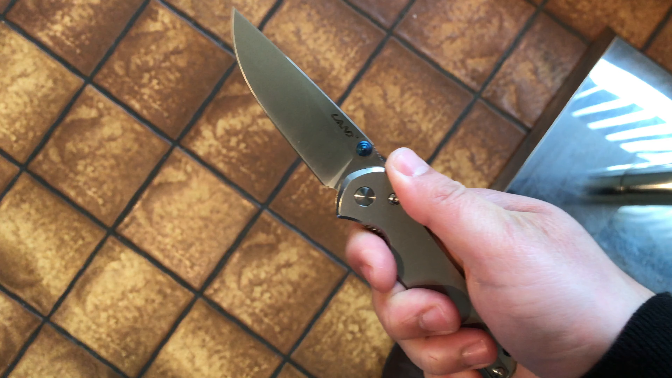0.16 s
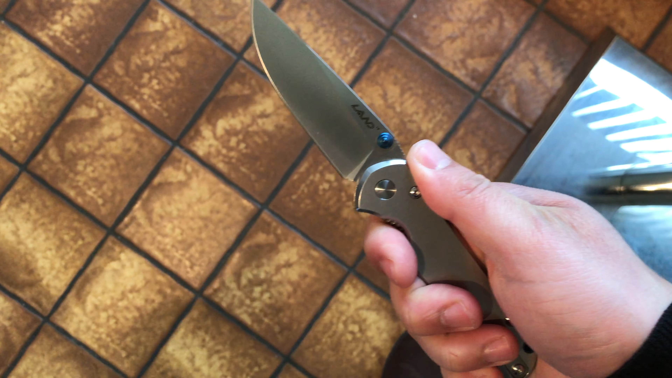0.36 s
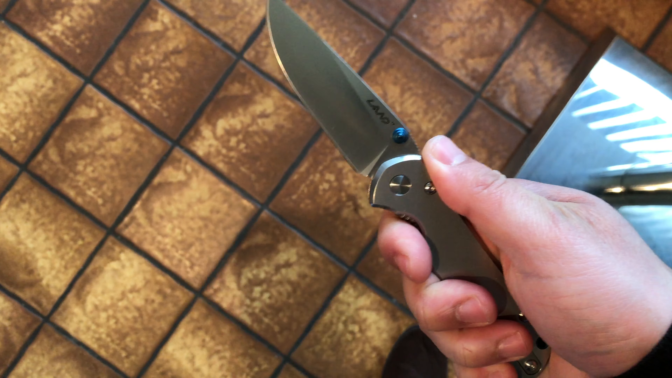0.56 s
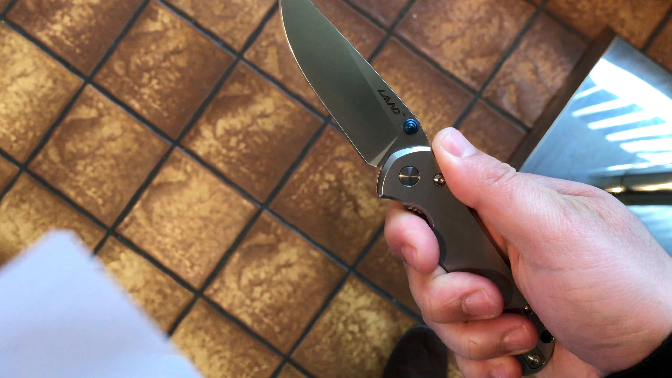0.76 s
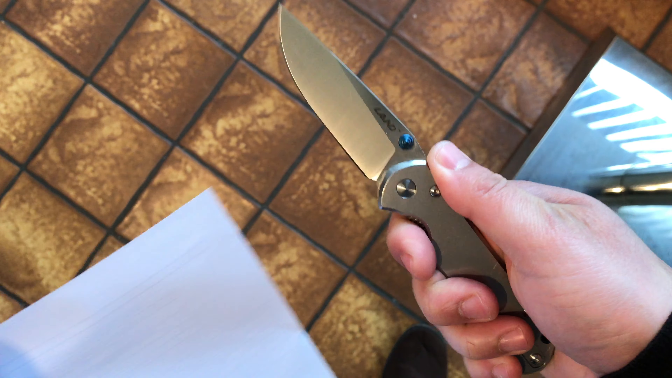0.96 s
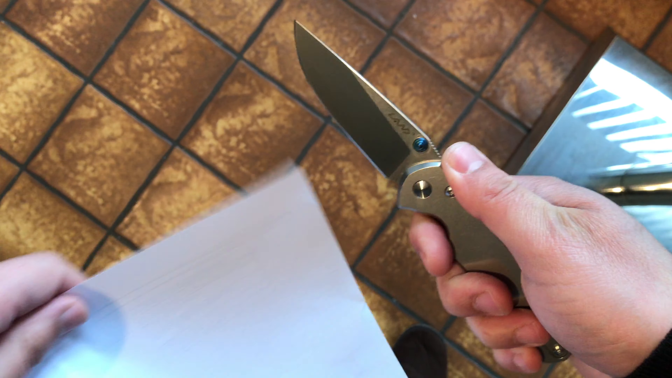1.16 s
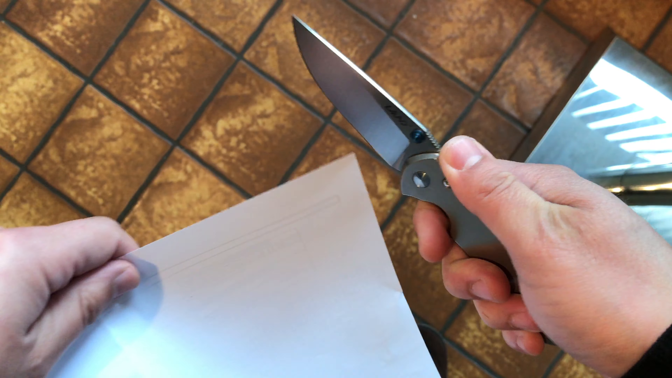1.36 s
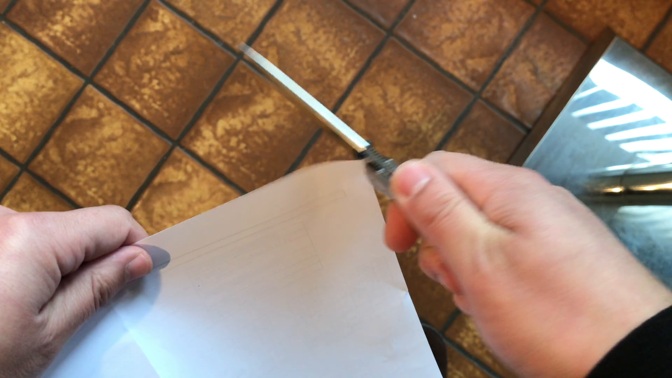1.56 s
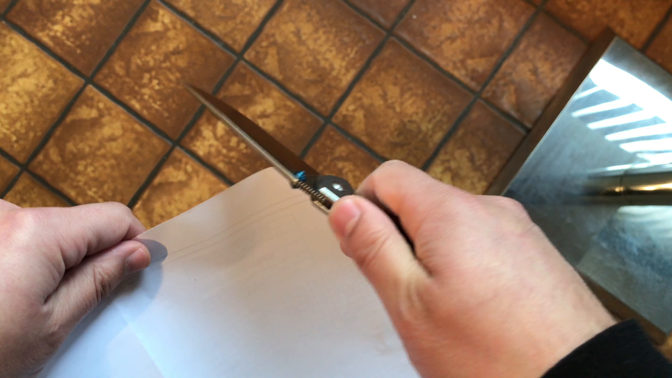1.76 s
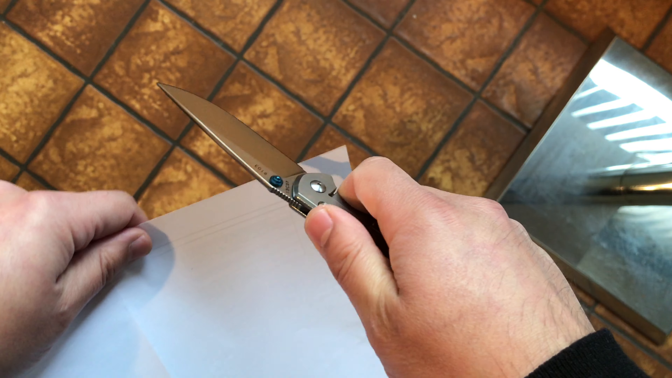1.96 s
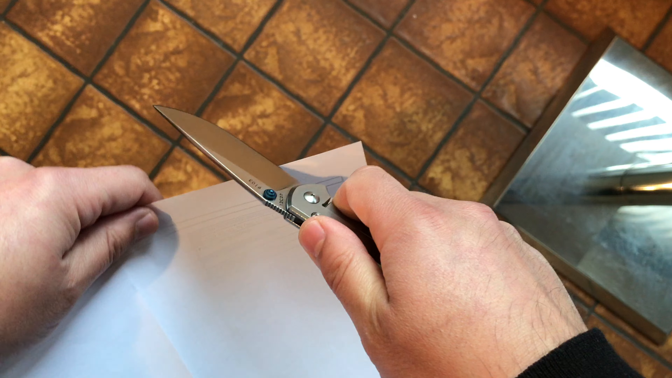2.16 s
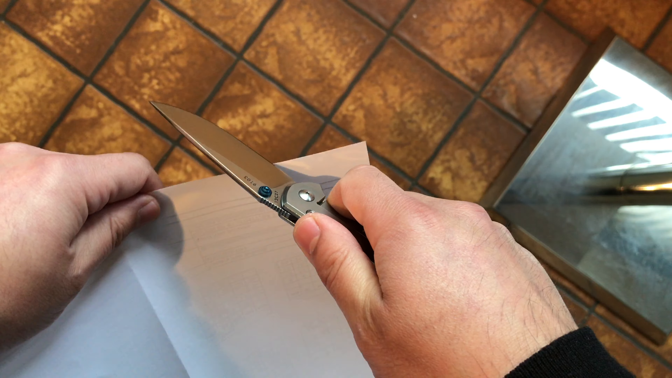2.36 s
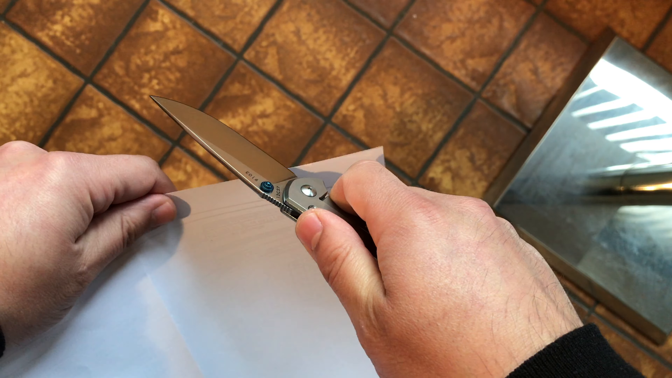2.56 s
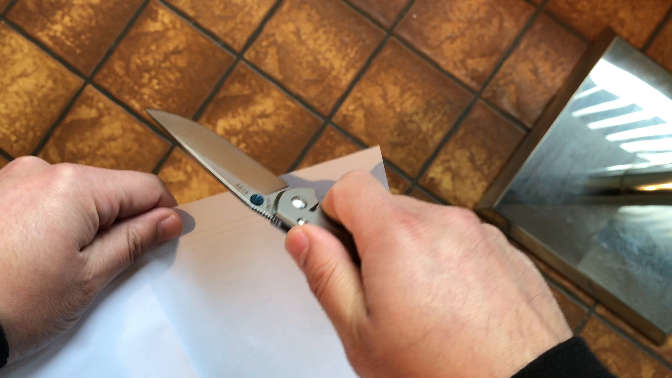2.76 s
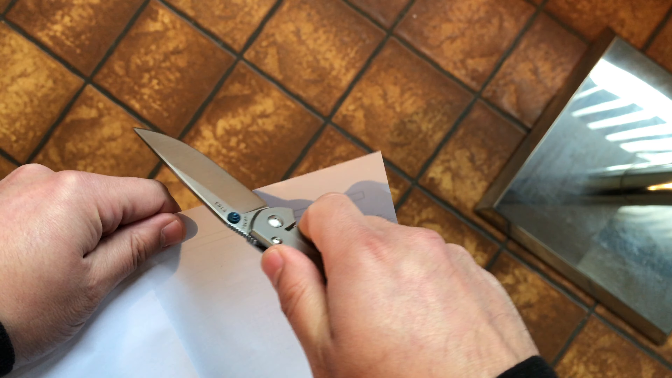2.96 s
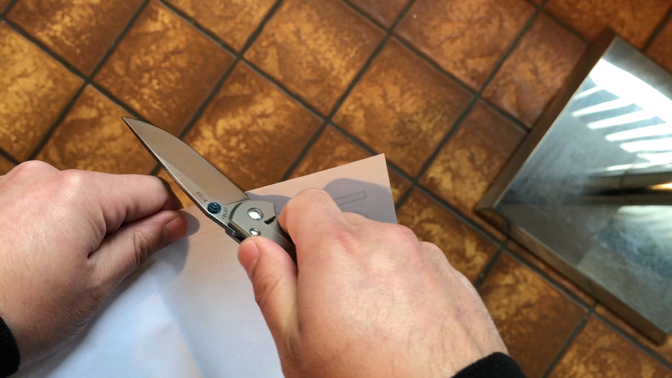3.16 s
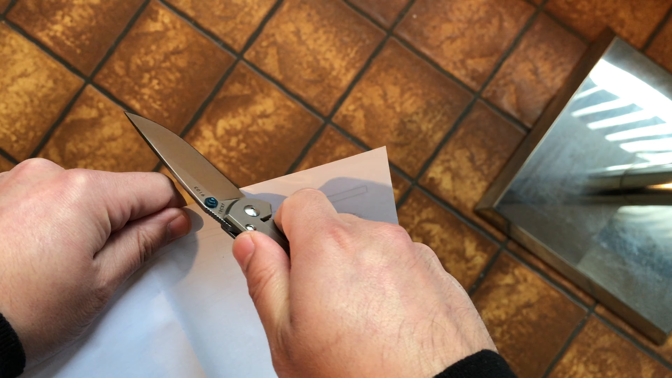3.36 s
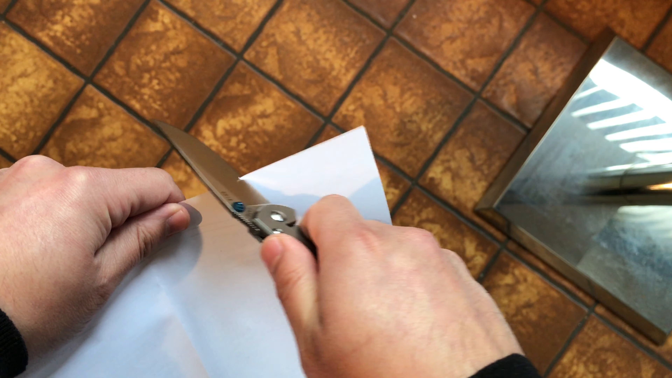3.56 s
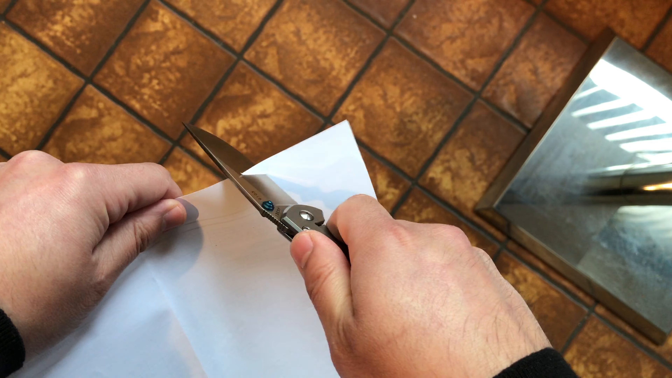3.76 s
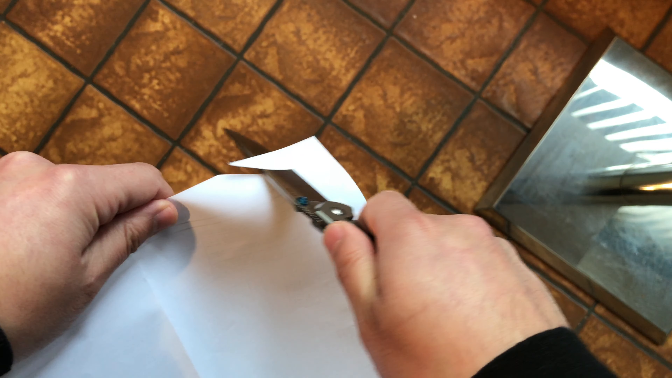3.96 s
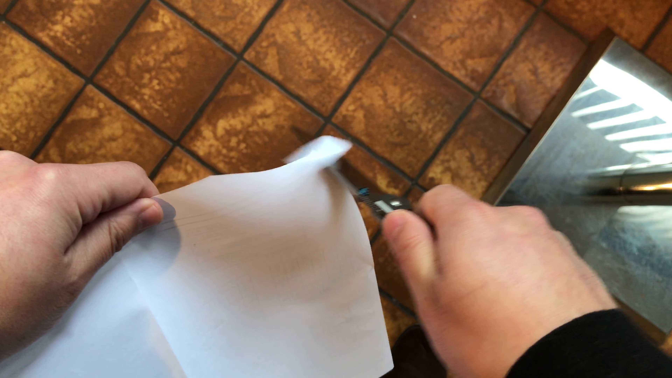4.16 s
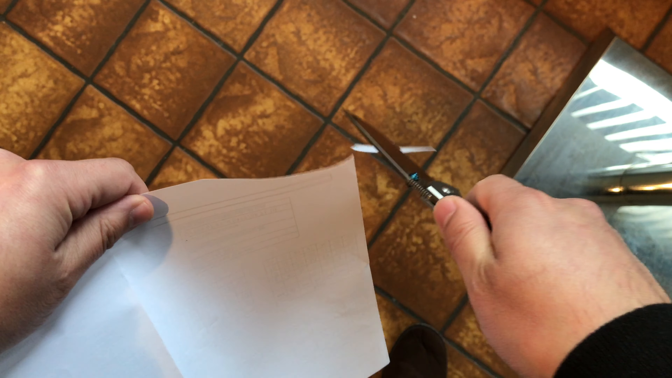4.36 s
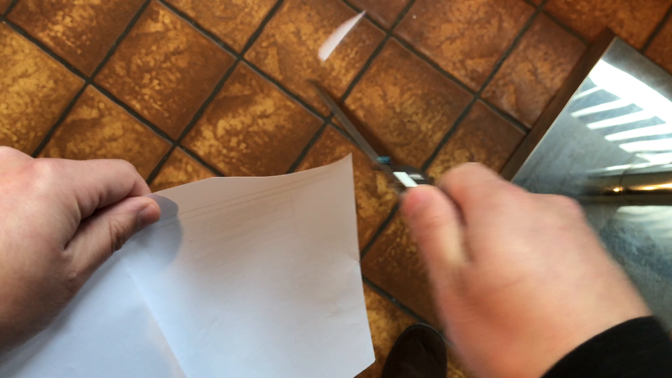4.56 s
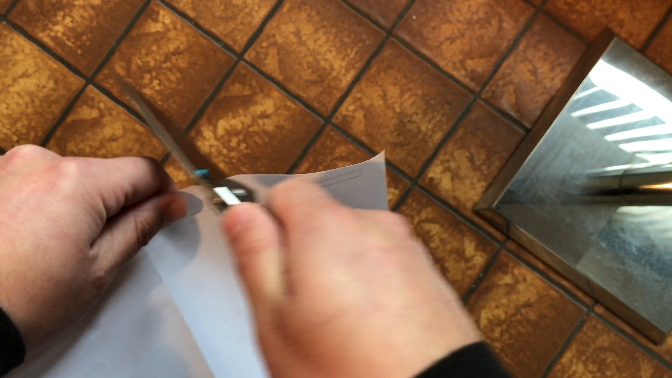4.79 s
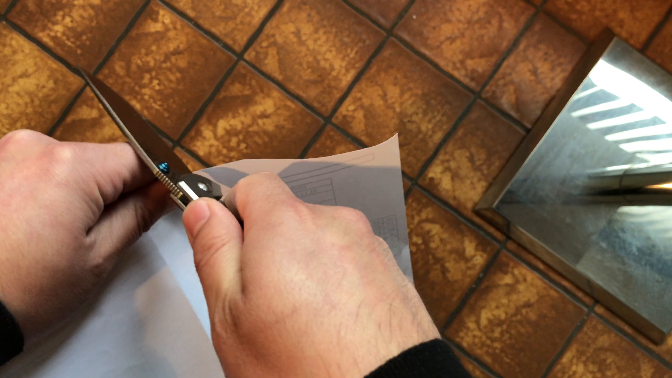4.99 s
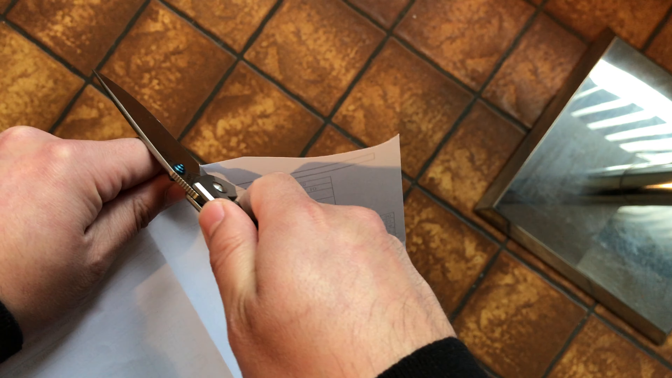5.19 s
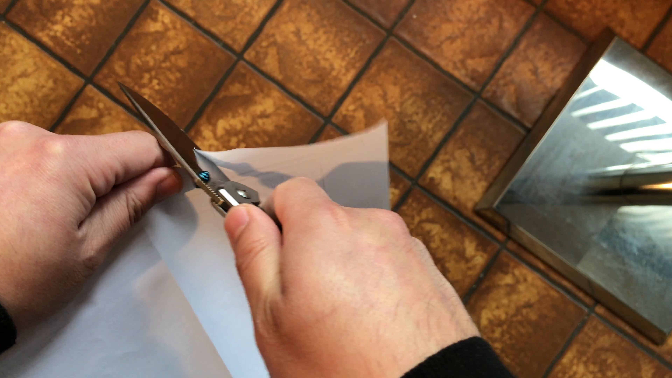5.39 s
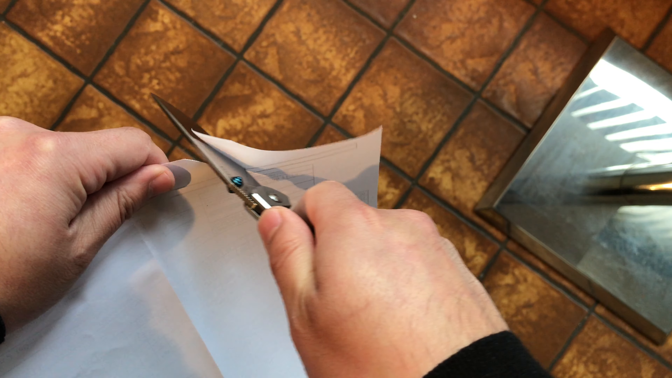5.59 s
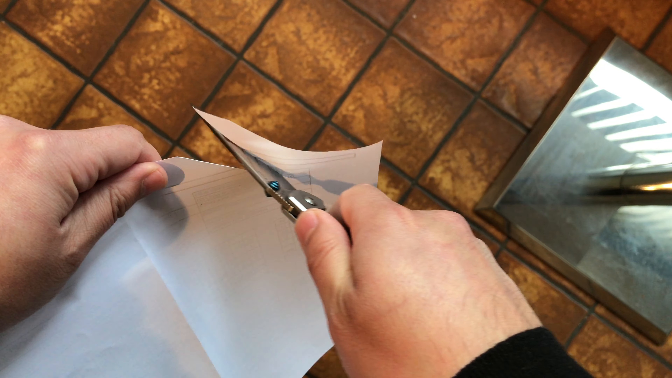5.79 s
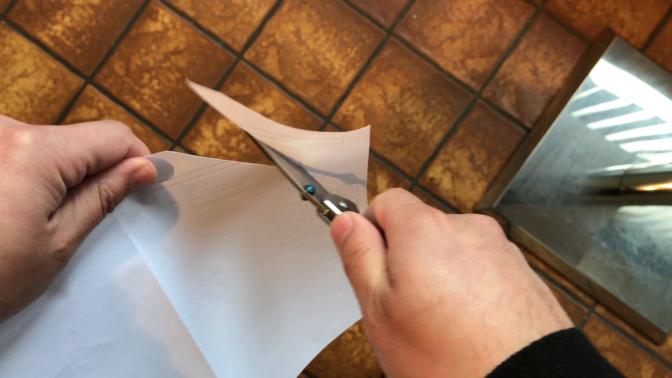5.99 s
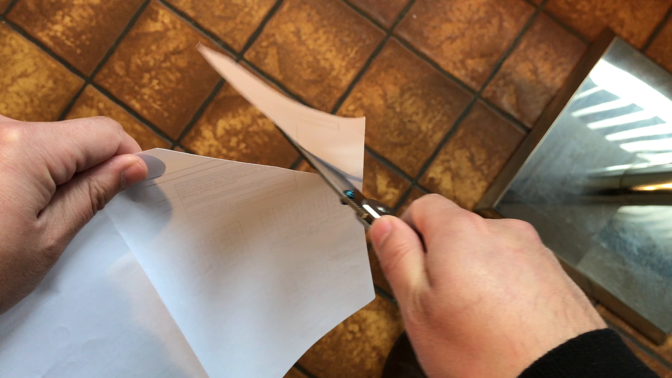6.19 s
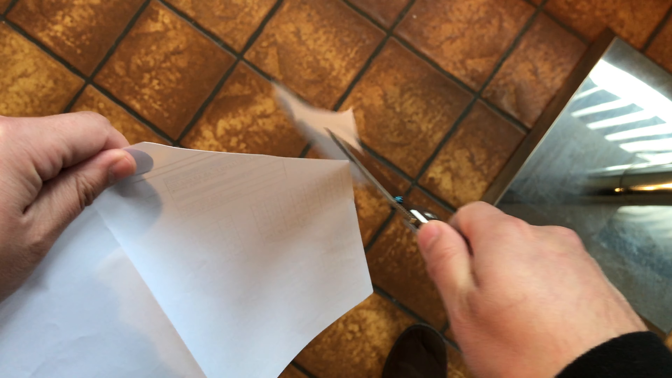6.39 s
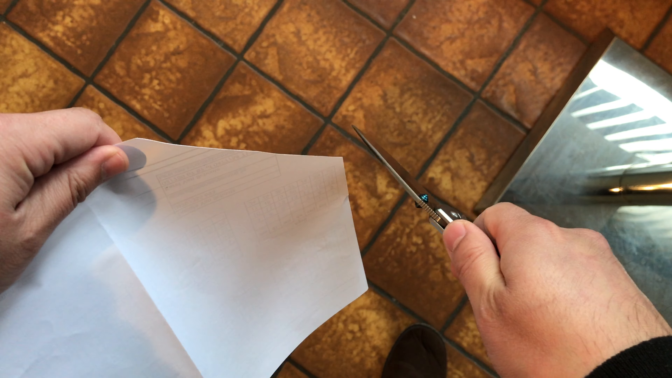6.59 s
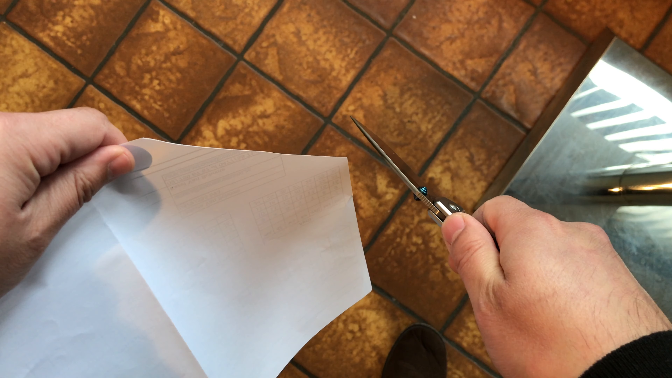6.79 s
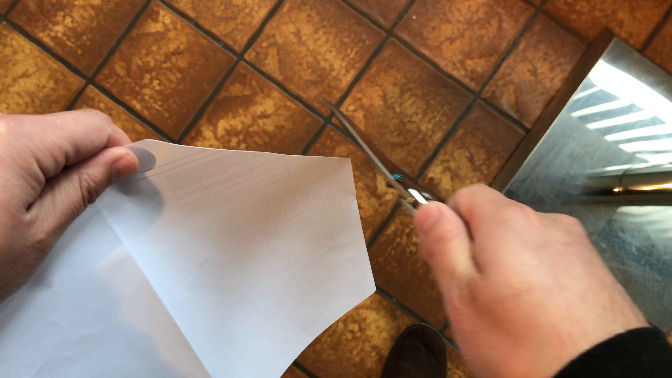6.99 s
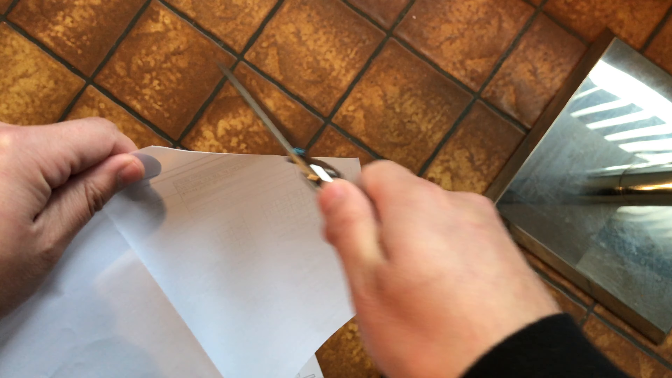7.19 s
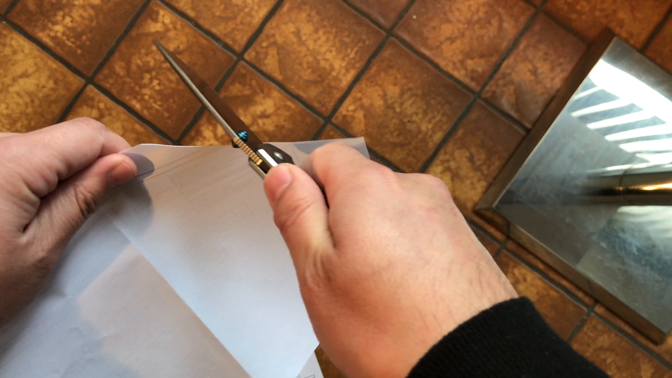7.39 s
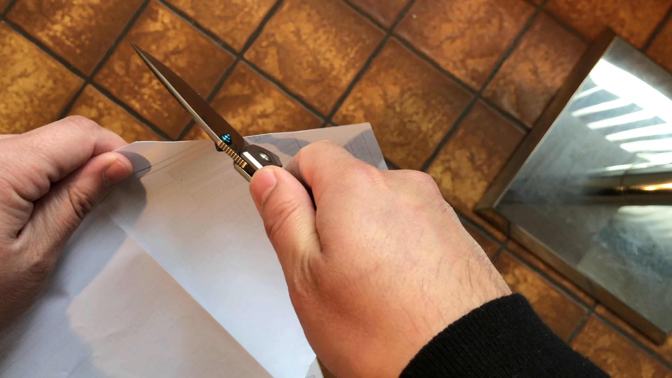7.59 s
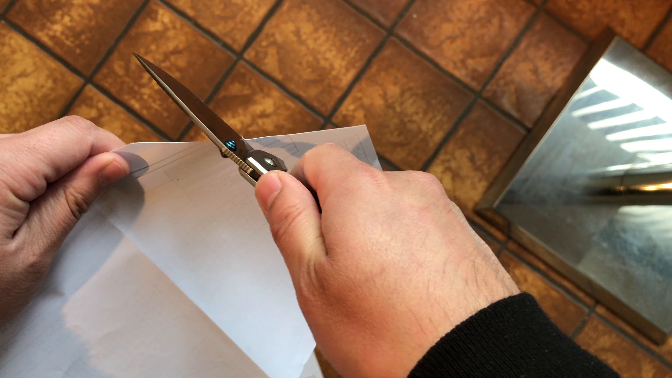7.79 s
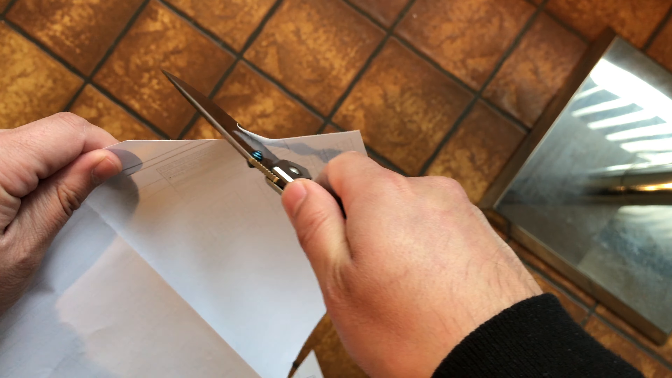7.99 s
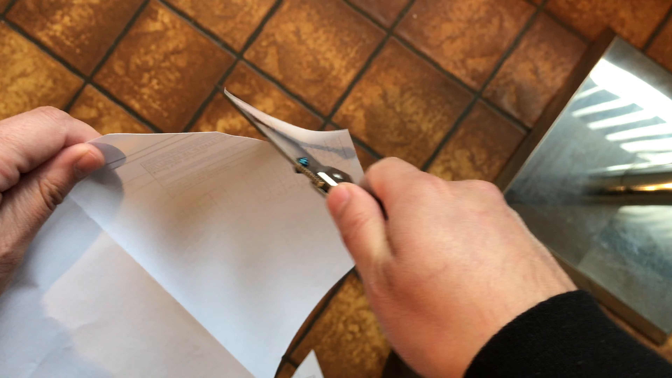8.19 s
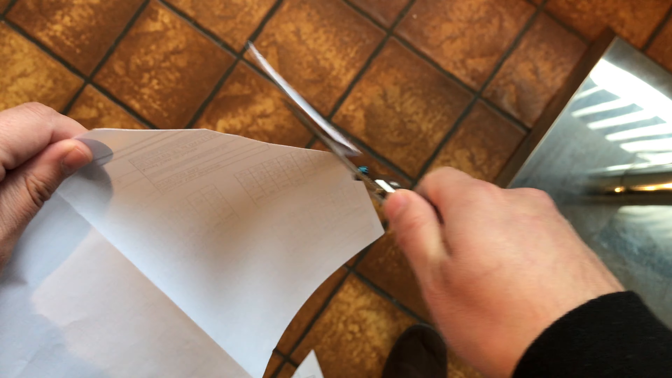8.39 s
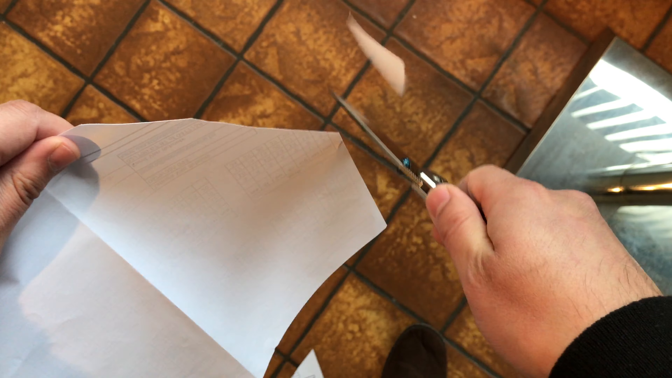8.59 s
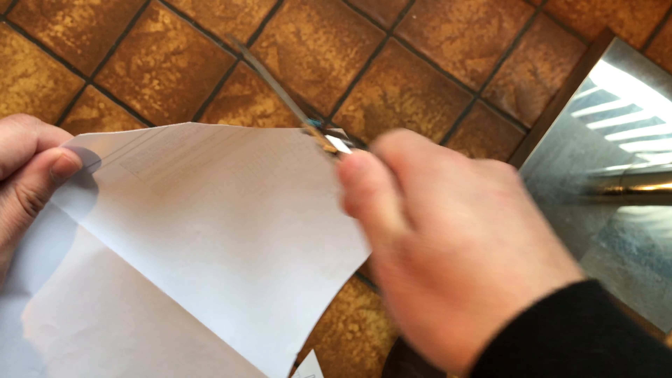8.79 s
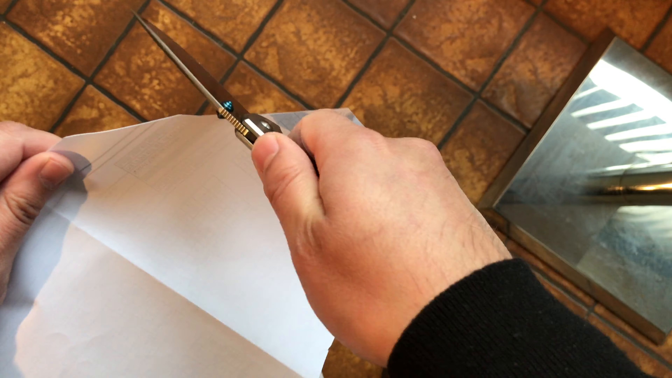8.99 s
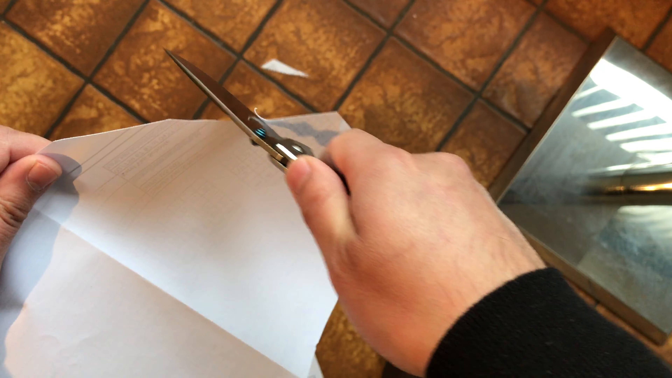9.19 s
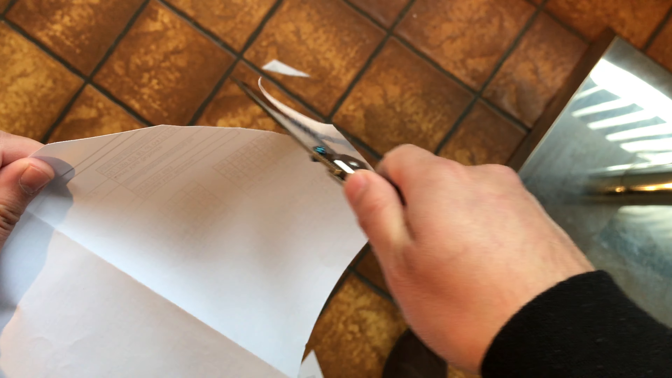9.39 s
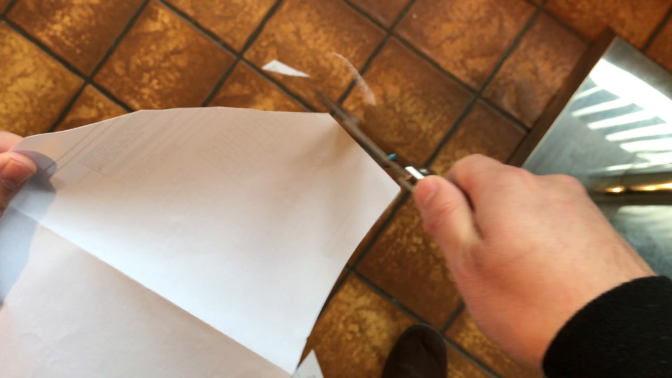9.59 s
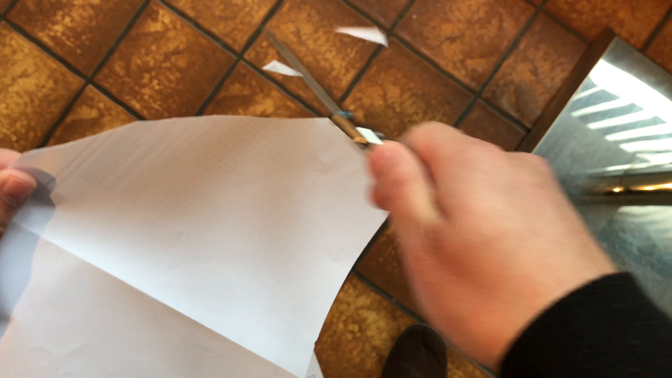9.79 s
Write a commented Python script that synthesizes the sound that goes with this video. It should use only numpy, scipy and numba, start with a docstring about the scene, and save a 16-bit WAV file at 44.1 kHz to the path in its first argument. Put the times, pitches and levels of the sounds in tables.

```python
"""A faint appliance hum and still air run throughout, in a tiled room, close to one microphone.
First a hand-held sheet of paper is picked up: it rustles, pops and flaps as buckles let go and fingers rub it.
Then a sharp folding knife slices strips off in five strokes, the third made of two pushes: the edge snaps
thousands of fibres, the curling strip rings and the blade mirrors the hiss. Late in the second stroke the sheet
buzzes briefly and a loud snap follows. Between and during the strokes steel scrapes and the sheet pops and knocks."""
import sys
import numpy as np
from scipy import signal
from scipy.fft import rfft, irfft
from scipy.io import wavfile
from scipy.ndimage import uniform_filter1d
from numba import njit

SR = 44100
rng = np.random.default_rng(int(sys.argv[2]) if len(sys.argv) > 2 else 0)


def dump_mix(stems):
    """Bounce the given channels to the path in sys.argv[1] as a 16-bit WAV at rate SR."""
    frames = np.atleast_2d(stems).T  # one column per channel
    limited = np.clip(frames, -1, 1)  # hard clip at full scale
    pcm = np.round(limited * 32767).astype(np.int16)
    wavfile.write(sys.argv[1], SR, pcm)


N = 434385
T = np.arange(N) / SR
FREQS = np.maximum(np.arange(N // 2 + 1) * SR / N, 1)

# The sheet pops as it buckles or is touched. Each row: start in seconds, level in dB, crispness (treble) in dB
# re level, ring time (60 dB decay) in seconds, wobble of the whole sheet in dB re level.
POP_EVENTS = [(0.202, -33.5, -2, 0.039, -14), (0.443, -38, -8, 0.08, -16), (0.496, -50.5, 3, 0.059, -15),
              (0.641, -38, -5.5, 0.047, -13), (0.686, -37, -6.5, 0.11, -9), (1.253, -29, -19, 0.089, -17),
              (1.495, -61.5, -3, .06, -12), (1.655, -28, -9, 0.065, -31), (1.683, -31.5, -11.5, 0.12, -20),
              (1.901, -42.5, -8.5, 0.17, -13), (1.955, -36, -2, 0.047, -8), (2.3, -46, -4.5, .063, -16),
              (2.376, -48.5, -14, 0.062, -4), (2.612, -39.5, -22, 0.011, -13),
              (2.641, -42.5, -10, 0.076, -6), (2.81, -57, -5, 0.054, 3), (2.857, -42, -20, .066, -8),
              (3.343, -52, -10, .19, -18), (3.612, -30, -27, .11, -22), (4.764, -64.5, -15.5, 0.043, -11.5),
              (5.196, -51.5, -3, .088, -14), (5.285, -51.5, 0.5, 0.25, -18), (7.12, -63.5, 3.5, 0.056, -15),
              (9.176, -36, -8, 0.11, -16), (9.657, -37.5, -16, .14, -12.5)]


def undb(db):
    """Decibels to gain."""
    return 10 ** (np.asarray(db) / 20)


def unit(x):
    """Scale to rms 1."""
    return x / np.sqrt(np.mean(x ** 2) + 1e-20)


def steady(x):
    """Even out the slow level and keep the grain."""
    return x / np.sqrt(uniform_filter1d(x ** 2, size=4000))


def colour(x, points):
    """Causal minimum-phase filter with the given (Hz, dB) outline, via the folded cepstrum."""
    hz, db = np.transpose(points)
    size = 4096
    grid_hz = np.maximum(np.fft.rfftfreq(size, 1 / SR), 1)
    outline_db = np.interp(np.log(grid_hz), np.log(hz), db)
    cepstrum = irfft(np.log(undb(outline_db)))
    cepstrum[1:size // 2] *= 2
    cepstrum[size // 2 + 1:] = 0
    response = irfft(np.exp(rfft(cepstrum)))
    return signal.fftconvolve(x, response)[:len(x)]


def band(x, lo_hz, hi_hz, order=2):
    """Causal Butterworth band-pass."""
    edges_hz = [lo_hz, min(hi_hz, SR / 2 - 100)]
    return signal.sosfilt(signal.butter(order, edges_hz, "band", fs=SR, output="sos"), x)


def thirds(x, low_hz, high_hz):
    """Split into body, middle and treble, which add up to the whole."""
    spectrum = rfft(x)
    body = 1 / (1 + (FREQS / low_hz) ** 4)
    treble = 1 / (1 + (high_hz / FREQS) ** 8)
    return [irfft(spectrum * weight, N) for weight in (body, 1 - body - treble, treble)]


@njit
def resonance(x, hz, width_hz):
    """State-variable band-pass whose centre moves."""
    y, b, l = np.empty(len(x)), 0., 0.
    for i in range(len(x)):
        g, k = np.tan(np.pi * hz[i] / SR), width_hz / hz[i]
        v = (b + g * (x[i] - l)) / (1 + g * (g + k))
        b, l, y[i] = 2 * v - b, l + 2 * g * v, k * v
    return y


def walk(knots_per_s):
    """Straight lines between random knots: slow chance with a spread near 1."""
    knots = rng.standard_normal(N)
    return np.interp(T * knots_per_s, np.arange(N), knots)


def fibres(per_s, spread_db):
    """Tiny snaps at random moments, of moderately unequal size and either sign."""
    hit = rng.random(N) < per_s / SR
    sign = rng.choice([-1, 1], N)
    size = undb(spread_db * np.clip(rng.standard_normal(N), -2, 2))
    return unit(hit * sign * size)


def hand_echoes(x):
    """Hand and handle mirror the treble; the paths change as they move and ripple the hiss."""
    # Each row: path delay in seconds, strength as a gain.
    echo_paths = [(.00045, .2), (.0009, .22), (.0016, .17)]
    treble = band(x, 4500, 18000, order=1)
    out = x
    for delay_s, gain in echo_paths:
        moving_delay_s = delay_s * (1 + .12 * walk(5))
        out = out + gain * np.interp(T - moving_delay_s, T, treble)
    return out


def room(x, wet_db, early_db):
    """Early echoes off the tiles, then a diffuse tail whose bands die at their own rates."""
    # Room decay. Each row: band centre in Hz, 60 dB decay time in seconds.
    decay_bands = [(120, 0.95), (500, 0.5), (1500, 0.5), (3500, 0.52), (6000, 0.37), (12000, 0.33)]
    t = T[:SR]
    hz, t60_s = np.transpose(decay_bands)
    edges_hz = np.r_[50, np.sqrt(hz[1:] * hz[:-1]), 17000]
    tail = np.zeros(SR)
    for lo_hz, hi_hz, decay_s in zip(edges_hz, edges_hz[1:], t60_s):
        tail += band(rng.standard_normal(SR), lo_hz, hi_hz, order=4) * undb(-60 * t / decay_s)
    tail *= np.clip((t - .004) / 0.0027, 0, 1)
    early = band(rng.standard_normal(SR), 100, 4900) * (t > .003) * np.exp(-t / 0.017)
    response = undb(wet_db) * tail / np.linalg.norm(tail) + undb(early_db) * early / np.linalg.norm(early)
    return x + signal.fftconvolve(x, response)[:N]


def background():
    """Still room air as coloured noise and an appliance's hum of sines wavering in pitch and level."""
    # Outline of the air noise. Each row: frequency in Hz, level in dB.
    air_colour = [(25, -20.5), (50, -0.5), (75, -4.5), (150, -10), (340, -11.5), (470, -22), (760, -21),
                  (1400, -26.5), (1850, -24), (2800, -31), (3800, -25), (5500, -35), (8500, -34),
                  (10200, -37.5), (15800, -34.5)]
    # Hum partials. Each row: frequency in Hz, spread of its wander in Hz, level in dB.
    hum_partials = [(49.6, 3, -93), (101, 5.1, -76), (589, 2.5, -72)]
    air_db = -65
    air = undb(air_db) * unit(colour(rng.standard_normal(N), air_colour)) * undb(0.27 * walk(12))
    hum = np.zeros(N)
    for hz, wander_hz, db in hum_partials:
        phase = 2 * np.pi * np.cumsum(hz + wander_hz * walk(25)) / SR
        hum += undb(db) * np.sin(phase) * undb(2 * walk(23))
    return air + hum


def sliding():
    """Skin and steel rub lightly over the paper: dense grain with sparse crinkles."""
    # Each row: start in seconds, length in seconds, level in dB, growth over the slide in dB,
    # body in dB re level, sizzle in dB re level.
    slides = [(-.02, 0.23, -50, -20.5, -2, -7.5), (0.189, .25, -51, -25, -7.5, -12.5),
              (0.42, 0.18, -57.5, -11, 1.5, -12), (0.563, 0.14, -52, 18, -3.5, -5),
              (0.71, .26, -61, -6.5, -4.5, -8.5), (0.956, 0.16, -62.5, -15, -2, -9),
              (1.093, 0.23, -62, -9, 3, -8.5), (1.29, 0.57, -71, -4, -1.5, -12),
              (1.707, 0.097, -58, -11, 3, 1), (1.776, 0.17, -65.5, -9, 0, -4),
              (2.106, 0.091, -56.5, -2, -24, -6.5), (2.219, .19, -60, 23, -4, -6.5),
              (2.45, 0.32, -56, -5.5, -4, -5.5), (3.429, 0.23, -56.5, 11, -2.5, -6),
              (3.82, 0.18, -57, -8, -5.5, -15), (4.205, 0.14, -51, -3.5, -1.5, -14),
              (4.333, 0.25, -67.5, -7, -2, -4.5), (4.532, 0.14, -64.5, -1, -5.5, -4),
              (5.194, 0.092, -54.5, 5, -9, -4.5), (7.7, 0.15, -73.5, 6, 2, -4),
              (8.542, 0.076, -59.5, 2, -0.5, -8), (9.6, 0.097, -53.5, -3, -8, -9)]
    # Outline of the rubbing. Each row: frequency in Hz, level in dB.
    rub_colour = [(70, -13.5), (160, -11.5), (330, -12.5), (480, -15), (1100, -9), (3800, -5),
                  (7200, -15.5), (9500, -20.5), (15800, -27.5)]
    attack_s, release_s = 0.024, 0.041
    crinkles = .35 * fibres(per_s=110, spread_db=3)
    grain = fibres(per_s=5000, spread_db=4) * undb(2.84 * walk(45))
    rub = hand_echoes(colour(grain + crinkles, rub_colour))
    body, middle, sizzle = map(unit, thirds(rub, low_hz=1237, high_hz=6840))
    out = np.zeros(N)
    for s, length_s, db, growth_db, body_db, sizzle_db in slides:
        now = (T >= s) & (T < s + length_s)
        t = T[now] - s
        touch = np.clip(np.minimum(t / attack_s, (length_s - t) / release_s), 0, 1)
        level = undb(db + growth_db * (t / length_s - .5))
        mix = middle[now] + undb(body_db) * body[now] + undb(sizzle_db) * sizzle[now]
        out[now] += touch * level * mix
    return out


def flaps():
    """The sheet swings over or brushes past: a quick swell of band-passed noise."""
    # Each row: start in seconds, length in seconds, level in dB, centre in Hz.
    flap_events = [(1.2434, 0.025, -43, 2140), (1.929, 0.051, -44.5, 8950), (1.94, 0.068, -27, 1850),
                   (4.179, 0.073, -35, 1020), (4.32, 0.048, -36, 1640), (7.118, 0.081, -62.5, 2590)]
    out = np.zeros(N)
    for s, length_s, db, hz in flap_events:
        noise = rng.standard_normal(int(length_s * SR))
        flap = unit(band(noise, hz / 3.17, hz * 1.72, order=3))
        swell = np.sin(np.pi * np.linspace(0, 1, len(flap)) ** 0.97)
        out[int(s * SR):][:len(flap)] += undb(db) * flap * swell
    return out


def wobbles():
    """Crowded modes of the sheet swell and die: those a knock strikes, and the lowest ones after every pop."""
    # The held sheet is nudged and knocks dully.
    # Each row: start in seconds, level in dB, centre in Hz, ring time (60 dB decay) in seconds.
    knocks = [(0.688, -30, 930, 0.13), (1.1158, -39.5, 620, 0.073), (1.177, -35, 900, 0.038),
              (1.261, -44.5, 328, 0.18), (1.686, -39, 342, 0.14), (1.822, -36, 300, 0.03),
              (1.957, -24, 327, 0.083), (1.966, -42.5, 68, 0.28), (2.379, -35, 890, 0.049),
              (2.429, -45, 795, 0.045), (2.478, -46, 596, 0.086), (2.811, -39.5, 980, .08),
              (2.86, -39, 790, .08), (5.205, -34, 410, 0.034), (7.691, -35.5, 600, 0.041),
              (7.703, -48, 140, 0.28), (8.58, -55, 170, 0.4), (9.179, -34, 560, .053),
              (9.68, -47, 330, 0.25)]
    # every pop sets the whole sheet wobbling like a loose skin
    wobble_hz, wobble_ring_s, wobble_lag_s = 144, 0.31, 0.0052
    lowest = [(s + wobble_lag_s, db + wobble_db, wobble_hz, wobble_ring_s)
              for s, db, _, _, wobble_db in POP_EVENTS]
    out, t = np.zeros(N + SR), T[:SR // 2]
    for s, db, hz, ring_s in knocks + lowest:
        modes = steady(band(rng.standard_normal(len(t)), hz / 1.5, hz * 1.34))
        onset = 1 - np.exp(-t / 0.0043)
        out[int(s * SR):][:len(t)] += undb(db - 60 * t / ring_s) * modes * onset
    return out[:N]


def snaps():
    """A crease, the blade meeting the edge or the last fibres: a single kick with a brief crackle behind it."""
    # Each row: start in seconds, peak in dB, top of the band in Hz.
    snap_events = [(0.2014, -26, 4500), (0.6884, -24.5, 2600), (1.18, -36.5, 2270), (1.2525, -11, 3400),
                   (1.6563, -13, 3330), (1.6597, -19, 7250), (1.685, -19, 2800), (1.9038, -39, 3000),
                   (1.9615, -19, 6700), (2.381, -35, 2560), (2.6109, -17, 5700), (4.2298, -6.5, 10960),
                   (7.6933, -40.5, 3570)]
    out, t = np.zeros(N + SR), T[:SR // 20]
    for s, db, top_hz in snap_events:
        crackle = 0.08 * rng.standard_normal(len(t)) * np.exp(-t / 0.0032)
        kick = band((t == 0) + crackle, 650, top_hz, order=3)
        out[int(s * SR):][:len(t)] -= undb(db) * kick / np.abs(kick).max()
    return out[:N]


def pops():
    """A buckle lets go at once and shivers through the sheet; the fine crackle builds a little later."""
    # Outline of the shiver. Each row: frequency in Hz, level in dB.
    shiver_colour = [(35, -40), (60, 18), (513, 3.5), (837, 9.5), (1680, 3), (2560, -2.5), (3470, 0),
                     (3720, -2.5), (7490, -25.5), (9460, -28), (10600, -31), (14400, -31), (15800, -39.5)]
    thud_db, middle_db = -6, 0
    out, t = np.zeros(N + SR), T[:SR // 4]
    for s, db, crisp_db, ring_s, _ in POP_EVENTS:
        decay = undb(-60 * t / max(ring_s, .005))
        burst = rng.standard_normal(len(t)) * decay * (1 - np.exp(-t / 0.00027))
        shiver = colour(burst, shiver_colour)
        thud = band(shiver, 290, 1100)
        middle = band(shiver, 900, 4800)
        crackle = band(shiver, 5070, 17000, order=3) * (1 - np.exp(-t / 0.001))
        for part_db, part in [(thud_db, thud), (middle_db, middle), (crisp_db, crackle)]:
            first_10ms_rms = np.sqrt(np.mean(part[:SR // 100] ** 2))
            out[int(s * SR):][:len(t)] += undb(db + part_db) * part / first_10ms_rms
    return out[:N]


def flutter():
    """The free end of the sheet flutters faster as it shortens: a short rising buzz of two harmonics."""
    # Each row: time in seconds, pitch in Hz, level in dB.
    flutter_path = [(4.13, 105, -60.5), (4.16, 132, -40.5), (4.195, 189, -35.5), (4.21, 190, -60)]
    s, hz, db = np.transpose(flutter_path)
    phase = 2 * np.pi * np.cumsum(np.interp(T, s, hz)) / SR
    sounding = (T > s[0]) * (T < s[-1])
    return sounding * undb(np.interp(T, s, db)) * (np.sin(phase) + 0.49 * np.sin(2 * phase))


def scraping():
    """The side of the blade scrapes along the cut edge: a band of hiss that swells and fades."""
    # Each row: start in seconds, length in seconds, level in dB, centre in Hz, width in Hz.
    scrapes = [(3.68, 0.14, -44, 14500, 3000), (5.43, 0.3, -41.5, 13500, 3500),
               (5.5, 0.26, -37.5, 8540, 2230), (5.6, 0.24, -37.5, 6300, 1600),
               (6.04, .17, -47, 14200, 2500), (7.208, 0.033, -58.5, 9600, 4000),
               (7.801, 0.27, -47, 7500, 2200), (8.18, .13, -43, 14200, 2460),
               (8.292, 0.13, -35.5, 8800, 2000), (9.172, .15, -49, 12500, 1800),
               (9.273, 0.12, -40, 9900, 1800), (9.388, .13, -38, 10100, 3000),
               (9.527, 0.073, -46, 8300, 1500)]
    grain = hand_echoes(fibres(per_s=8000, spread_db=4))
    out = np.zeros(N)
    for s, length_s, db, hz, width_hz in scrapes:
        now = (T >= s) & (T < s + length_s)
        hiss = unit(band(grain[now], hz - width_hz / 2, hz + width_hz / 2))
        out[now] += undb(db) * hiss * np.sin(np.pi * (T[now] - s) / length_s)
    return out


def pushes():
    """Each push bites, speeds up and eases off; speed sets levels and strip's ring, travel moves the notch."""
    # Each row: start in seconds, length in seconds, level in dB, bite time in seconds, swell in dB,
    # fastest point as a share of the push, body in dB re level, sizzle in dB re level, strip's ring in Hz,
    # strip's ring in dB, notch of the blade's reflection at the start in Hz, at the end in Hz.
    push_events = [ (3.608, 0.22, -37, .02, 7.5, 0.66, -11, -7, 3946, -7.5, 9100, 8000),
                   (3.929, 0.29, -27.5, 0.03, 0, 0.49, -13, -10, 3565, 5, 10000, 9700),
                   (5.297, .765, -35.5, 0.075, 15.5, 0.75, -10.5, -7, 3040, -14.5, 4820, 4930),
                   (6.013, 0.37, -30.5, 0.033, 2.5, 0.49, -15.5, -12, 4376, -5.5, 9700, 9300),
                   (7.795, .69, -31, 0.083, 18, 0.86, -12.5, -10, 2765, -3, 4600, 7300),
                   (9.178, .417, -30, 0.028, 11, 0.71, -12.5, -11.5, 3600, -12.5, 5300, 8500), ]
    speed_curve = 1.3  # how broad the fastest part of a push is
    body_follows, sizzle_follows = 0.14, 0.55  # shares of the swell
    ring_rise_octaves, ring_fade_db = 0.94, 11  # under a slow blade the strip rings higher and weaker
    release_s = 0.025
    gains, ring_hz, ring_db, notch_hz = np.zeros((3, N)), np.ones(N), np.zeros(N), np.ones(N)
    for (s, length_s, db, bite_s, swell_db, fastest, body_db, sizzle_db,
         strip_hz, strip_db, first_hz, last_hz) in push_events:
        now = (T >= s) & (T < s + length_s + release_s / 2)
        t = T[now] - s
        travel = np.minimum(t / length_s, 1)
        slowness = np.minimum(np.abs(travel / fastest - 1), 1) ** speed_curve
        grip = (1 - np.exp(-t / bite_s)) * np.clip((length_s - t) / release_s + .5, 0, 1)
        parts = [(body_db, body_follows), (0, 1), (sizzle_db, sizzle_follows)]
        for k, (part_db, follows) in enumerate(parts):
            gain = grip * undb(db + part_db - follows * swell_db * slowness)
            gains[k, now] = np.hypot(gains[k, now], gain)
        ring_hz[now] = strip_hz * 2 ** (ring_rise_octaves * slowness)
        ring_db[now] = strip_db - ring_fade_db * slowness
        notch_hz[now] = first_hz + (last_hz - first_hz) * travel ** 2
    # bridge the gaps between pushes
    cutting = gains[1] > 0
    return gains, *(np.interp(T, T[cutting], curve[cutting]) for curve in (ring_hz, ring_db, notch_hz))


def slicing():
    """Fibres part in uneven bunches; sheet, strip and blade colour their hiss."""
    # Outline of the cut. Each row: frequency in Hz, level in dB.
    cut_colour = [(53, -32), (90, -20.5), (151, -10.5), (265, -15), (367, -8), (446, -15), (717, -5),
                  (971, -7), (1210, -2.5), (3790, -2.5), (5840, -5.5), (7570, -11.5), (9200, -11.5),
                  (14500, -18.5), (15800, -17.5)]
    gains, ring_hz, ring_db, notch_hz = pushes()
    # the edge catches and slips on the uneven pulp
    catch = undb(1.5 * walk(600) + 1.0 * walk(90) + .5 * walk(18))
    in_sheet = fibres(per_s=8000, spread_db=4.5)
    in_strip = fibres(per_s=6000, spread_db=3.5)
    sheet = unit(colour(in_sheet, cut_colour))
    ring = resonance(in_strip, np.minimum(ring_hz * (1 + .03 * walk(30)), SR / 3), 3300.)
    ring = resonance(ring, np.minimum(ring_hz, SR / 3), 3000.)
    hiss = catch * (sheet + undb(ring_db) * unit(ring))
    # the far face radiates in antiphase and returns off the moving blade, weakening two bands
    for multiple, depth, width_hz in [(1, .55, 1000.), (2, .45, 1400.)]:
        hiss = hiss - depth * resonance(hiss, np.minimum(multiple * notch_hz, .42 * SR), width_hz)
    parts = thirds(hand_echoes(hiss), low_hz=1944, high_hz=7530)
    return sum(gain * steady(part) for gain, part in zip(gains, parts))


def scene():
    """Paper and knife in the room, the same in both channels."""
    rubbing = room(slicing() + scraping() + sliding(), wet_db=-14, early_db=-14)
    handling = room(pops() + snaps() + flaps() + wobbles() + flutter(), wet_db=-14, early_db=-14.5)
    mono = rubbing + handling + background()
    return np.array([mono, mono])


def record(dry):
    """The microphone colours the sound and the recorder cuts the top."""
    # Colour of the microphone and its port. Each row: frequency in Hz, level in dB.
    mic_colour = [(20, -11.5), (50, 0), (6900, -1), (7500, -2.5), (8300, 0), (9700, 1.5), (10400, -2),
                  (11500, 2), (15000, 0), (16000, -1)]
    top_hz = 15950
    heard = np.array([colour(channel, mic_colour) for channel in dry])
    return signal.sosfiltfilt(signal.ellip(10, .1, 60, top_hz, fs=SR, output="sos"), heard)


dry = scene()
out = record(dry)
dump_mix(out)
```